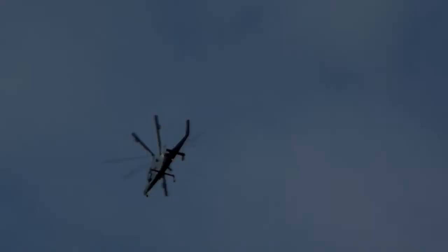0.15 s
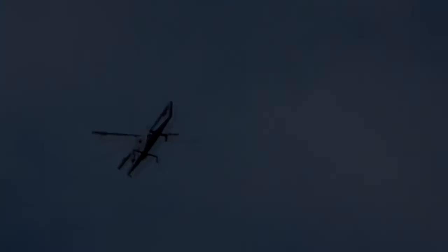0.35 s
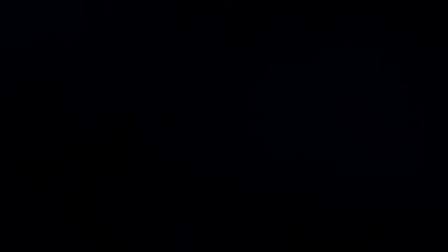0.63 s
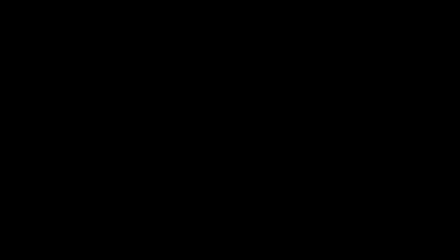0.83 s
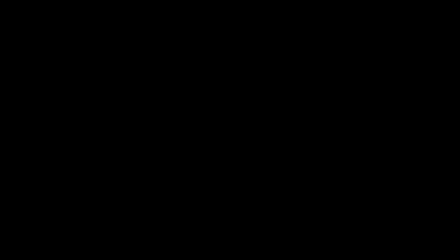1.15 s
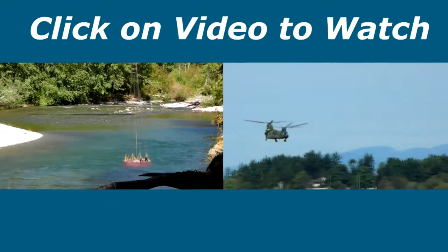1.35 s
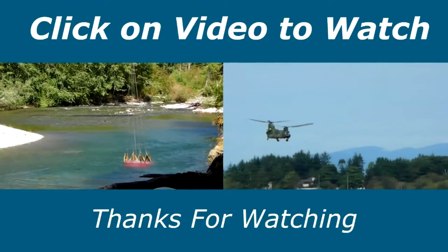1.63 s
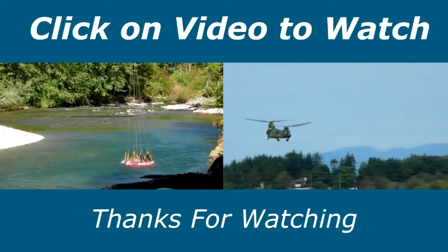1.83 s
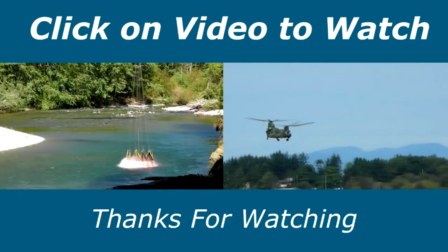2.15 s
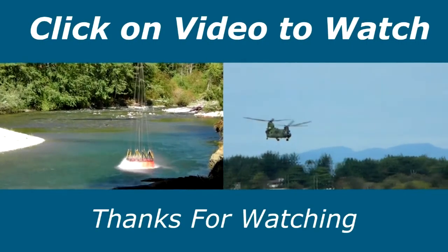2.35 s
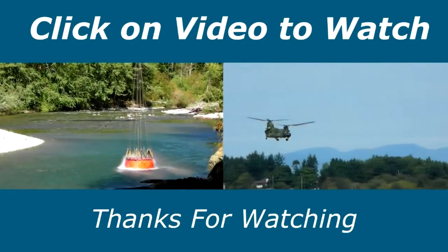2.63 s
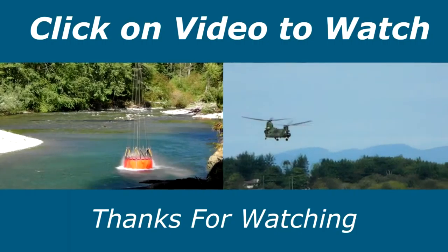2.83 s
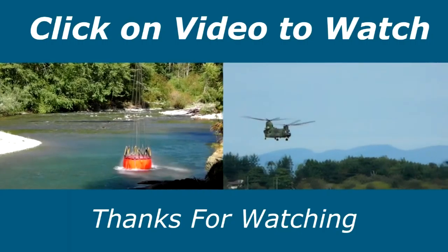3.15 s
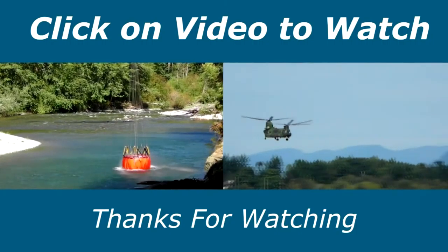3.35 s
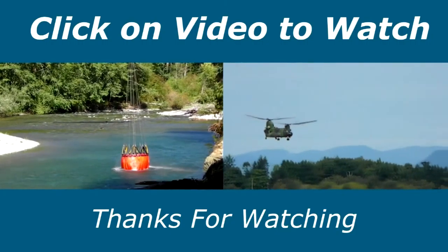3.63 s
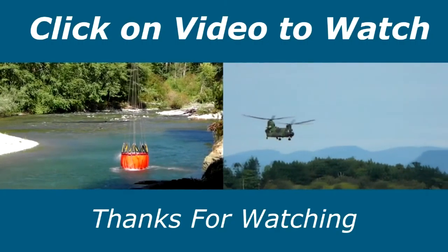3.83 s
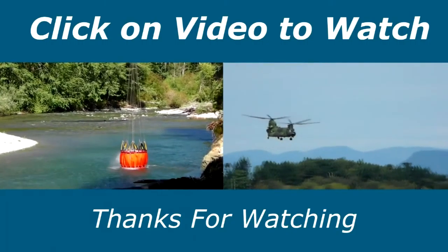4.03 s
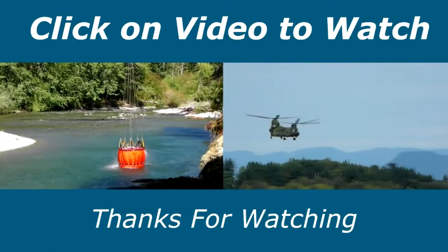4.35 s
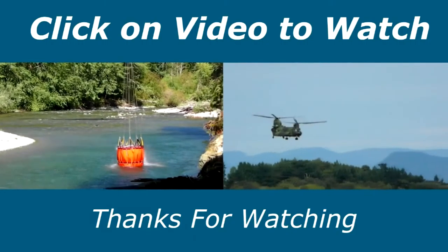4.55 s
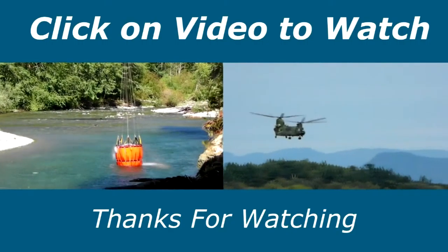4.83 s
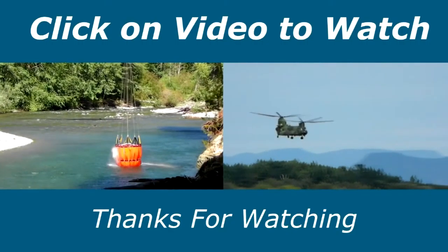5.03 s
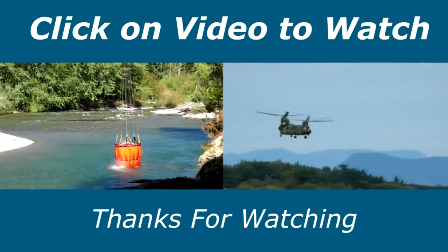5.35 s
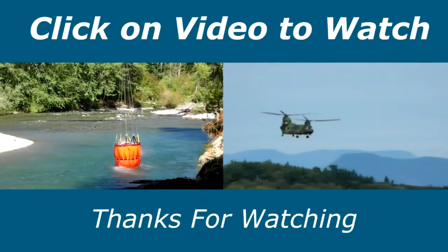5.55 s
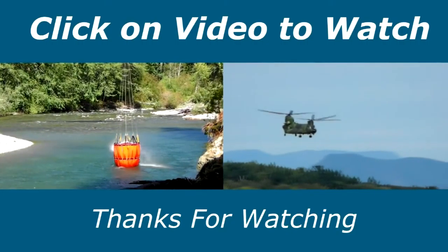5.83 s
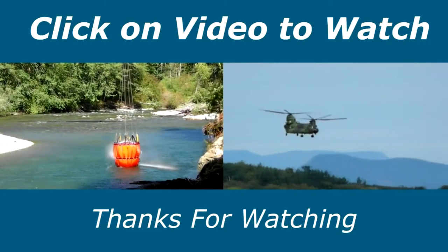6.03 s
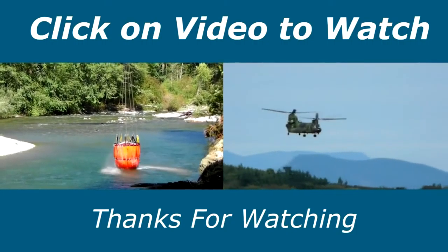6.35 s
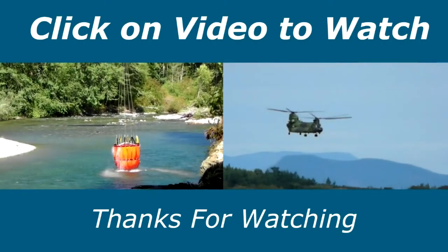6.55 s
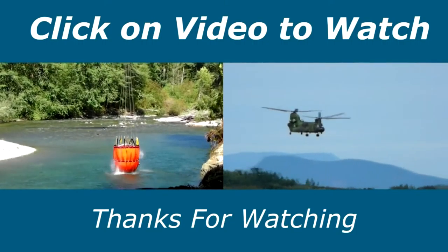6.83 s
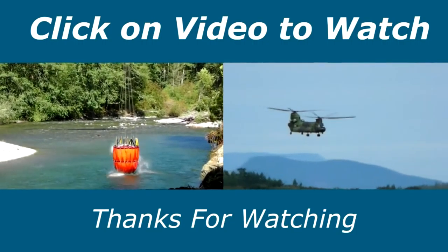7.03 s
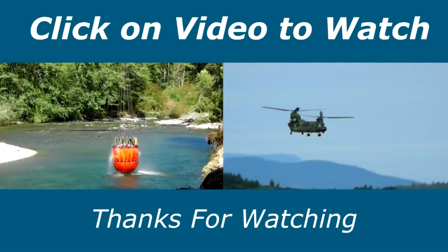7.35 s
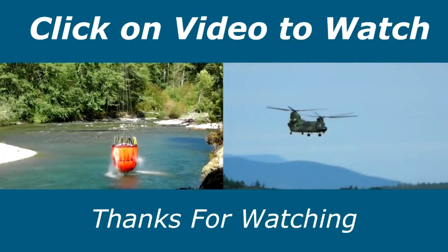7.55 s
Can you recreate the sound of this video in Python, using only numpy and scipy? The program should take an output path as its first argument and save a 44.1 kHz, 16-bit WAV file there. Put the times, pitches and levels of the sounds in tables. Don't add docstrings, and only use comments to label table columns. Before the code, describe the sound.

Outdoors on open ground, a far helicopter howls with a breathy turbine whine and soft quick blade flaps, fading within about a second. After a short dead silence, a twin-rotor helicopter fades in, its sharp front slaps about fourteen a second, with softer rear answers between them over turbine roar. It swells and eases as it turns, then jumps back abruptly and repeats. A faint bird whistles once; small dry ticks sit near the microphone.

```python
import sys
import numpy as np
from scipy import signal
from scipy.io import wavfile
from scipy.ndimage import uniform_filter1d

SR = 44100
rng = np.random.default_rng(int(sys.argv[2]) if len(sys.argv) > 2 else 0)


def volts_from_db(level):
    exponent = np.asarray(level, float) / 20
    return 10 ** exponent


def file_out(sig):
    cols = np.atleast_2d(sig).T
    lim = np.clip(cols, -1, 1)
    pcm = np.round(lim * 32767).astype(np.int16)
    wavfile.write(sys.argv[1], SR, pcm)


N = 339129

# f/Hz, level/dB per Hz
FAR_COLOUR = [(30, -59.5), (100, -21), (197, -28), (300, -16), (460, -11.5), (510, -10.5), (860, -9),
              (1100, -13.5), (1500, -11.5), (2150, -4.5), (3500, -30), (4700, -39), (5300, -54.5),
              (15500, -53.5)]
# from f/Hz, to f/Hz
FAR_BANDS = [(450, 1300), (8500, 15000)]
# f/Hz, width/Hz, level/dB
FAR_HOWL = [(1963, 160, 1), (2130, 110, 0), (2544, 240, -7.5), (1808, 70, -4.5), (2380, 440, -5.5),
            (890, 120, -10.5)]
# t/s, level/dB
FAR_WHINE = [(0, -58), (.16, -50.5), (.33, -57.5), (.4, -75), (.62, -76), (.72, -61), (.91, -69),
             (.95, -77), (1.14, -89.5)]
# t/s, level/dB
FAR_FADE = [
    (0, 0),
    (.45, -2),
    (.65, -7),
    (.9, -15),
    (1.07, -19),
    (1.14, -42),
]
# t/s, f/Hz, level/dB
BIRD = [
    (3.5, 3830, -75),
    (3.53, 3810, -49),
    (3.6, 3700, -46),
    (3.63, 3710, -70),
]
# t/s, level/dB, f/Hz, length/s
RUSTLES = [
    (.332, -42.5, 10160, 0.0019),
    (0.316, -56.5, 5550, .05),
    (0.33, -60.5, 12300, .05),
    (0.392, -67, 12600, .07),
    (6.1156, -39, 5670, 0.01),
    (6.169, -41, 6130, 0.0058),
    (6.193, -36.5, 8070, 0.0079),
]
# f/Hz, level/dB per Hz
TWIN_COLOUR = [(26, -42), (112, -15), (232, -2), (382, -3), (522, -0.5), (722, 0), (1010, -7), (1620, -13),
               (2650, -16), (4250, -24), (6250, -32.5), (8050, -34.5), (10500, -43), (15400, -65)]
# from f/Hz, to f/Hz
TWIN_BANDS = [(300, 1000), (1500, 4000), (4500, 7300), (8500, 13000)]
# t/s, turbine roar level/dB, rush of air level/dB
ENGINE = [(1.24, -42, -59.5), (1.68, -38, -56.5), (1.93, -33.5, -57.5), (2.11, -34, -59.5),
          (2.37, -35.5, -61), (2.6, -36, -58.5), (2.9, -36, -65), (3.26, -37.5, -57), (3.54, -39.5, -62),
          (3.74, -33, -58), (4.05, -28.5, -60), (4.28, -37.5, -61.5), (4.45, -36, -70), (4.63, -29.5, -67),
          (4.84, -30, -68), (5.1, -34, -73), (5.32, -34, -70), (5.52, -33.5, -61.5)]
HUM_ORDERS = [4, 6, 8, 11]
# level before the turn/dB, level after/dB, share of the rear loading
HUM = [(-38.5, -37.5, 0.39), (-49.5, -34, 0.43), (-45, -64, 0.012), (-58.5, -43.5, 0.032)]
# count of passes, spacing/ms
PERIODS = [
    (8, 71.49),
    (16, 71.21),
    (11, 71.67),
    (6, 71.83),
    (18, 72.245),
]
# t/s, front slap level/dB, thump level/dB, rear answer level/dB, tip crack level/dB
LOADING = [(1.26, -9, -21, -39.5, -49), (1.66, -12, -32, -31.5, -50), (1.8, -8, -18, -39, -36),
           (2.0, -6, -18, -27, -38), (2.3, -6.5, -29, -22.5, -37.5), (2.55, -6, -34, -23.5, -34.5),
           (2.68, -6.5, -40, -27, -36.5), (2.88, -8.5, -40, -32, -48), (3.0, -12.5, -30, -29.5, -45.5),
           (3.26, -16, -22, -28.5, -47.5), (3.55, -9.5, -14, -24, -43.5), (3.8, -6.5, -20, -21.5, -41.5),
           (4.12, -12, -14, -25, -45), (4.3, -4.5, -16, -25.5, -37), (4.68, -8.5, -11.5, -21.5, -33.5),
           (4.8, -6, -7, -23.5, -39), (5.13, -5.5, -19, -21, -34.5), (5.5, -7.5, -9, -25.5, -47.5)]
# slap/dB, thump/dB, rear/dB, crack/dB, flutter/dB
SCATTER_DB = (.6, 2.5, 1.2, 2, 2.5)
# t/s, level/dB, width/s
VORTEX_HITS = [
    (1.91, -9, .05),
    (2.08, -9, .2),
    (3.33, -11.5, .05),
    (2.54, -15, 0.12),
    (4.67, -5, .11),
    (5.35, -7.5, 0.18),
]
# f/Hz, width/Hz, depth 0-1
NOTCHES = [(191.8, 31, 1), (7930, 1100, 0.96)]

FAR_END_S, TWIN_START_S = 1.14, 1.368
ROUND_FROM_S, ROUND = 1.23, 189452
TURN_START_S, TURN_END_S = 2.94, 3.6
PASS_MS = np.arange(-25, 25, 1000 / SR)


def evened(x):
    return x / np.sqrt(np.mean(x ** 2) + 1e-20)


def read(points, hz):
    f, value = np.transpose(points)
    return np.interp(np.log(hz + 1), np.log(f + 1), value)


def curves(rows, t):
    s, *columns = np.transpose(rows)
    return [np.interp(t, s, c) for c in columns]


def add(mix, s, sound):
    part = mix[round(s * SR):][:len(sound)]
    part += sound[:len(part)]


def band(x, hz, width):
    b, a = signal.iirpeak(hz, hz / width, SR)
    once = signal.lfilter(b, a, x)
    return evened(signal.lfilter(b, a, once))


def bump(x, centre, width):
    return np.exp(-((x - centre) / width) ** 2)


def air_noise(count, colour, bands, levels_db, patchy_db):
    hz = np.fft.rfftfreq(1024, 1 / SR)
    a, b, patches = rng.standard_normal((count // 256 + 5, 513, 3)).T
    patches = evened(uniform_filter1d(uniform_filter1d(patches, 10, 0), 10, 1))
    shape_db = read(colour, hz)
    own_db = [10 * np.log10(np.sum(volts_from_db(2 * shape_db)[(hz > lo) & (hz < hi)])) for lo, hi in bands]
    frames = np.minimum(np.arange(a.shape[1]) * 256, count - 1)
    lift_db = np.array([level[frames] - own for level, own in zip(levels_db, own_db)])
    centres = np.mean(bands, 1)
    share = np.array([read(list(zip(centres, row)), hz) for row in np.eye(len(bands))])
    z = (a + 1j * b) * volts_from_db(shape_db[:, None] + share.T @ lift_db + patchy_db * patches)
    return np.sqrt(1.5) * signal.istft(z, nperseg=1024, noverlap=768)[1][:count]


def far_howl(t, fade_db):
    throb_db = 7.5 * bump(t, .4, 0.17) * np.cos(2 * np.pi * (t - 0.2826) / .1)
    dulls_db = -43.5
    howl = np.zeros(len(t))
    for hz, width, db in FAR_HOWL:
        tilt_db = dulls_db * (hz / 1000 - 2) * np.minimum(t - .25, 0)
        howl += volts_from_db(db + tilt_db) * band(rng.standard_normal(len(t)), hz, width)
    gusts = uniform_filter1d(uniform_filter1d(rng.standard_normal(len(t)), size=200), size=200)
    return volts_from_db(-25 + fade_db + throb_db + 1.3 * evened(gusts)) * evened(howl)


def far_beats(count):
    first_s, period_s, passes_heard = .087, .1125, 10
    out = np.zeros(count)
    u = np.arange(2000) / SR
    rise = 1 - np.exp(-u / 0.00092)
    thud = np.sin(2 * np.pi * 105 * u) + 0.67 * np.sin(2 * np.pi * 160 * u)
    thud *= bump(u, 0.014, .012)
    for k, (p, q) in enumerate(rng.random((passes_heard, 2))):
        s = first_s + k * period_s
        faded_db = 0.84 * curves(FAR_FADE, s)[0]
        flap = np.sin(2 * np.pi * (295 * u + p)) + 0.95 * np.sin(2 * np.pi * (440 * u + q))
        add(out, s, volts_from_db(-24 + faded_db - 4 * (k % 2)) * rise * np.exp(-u / 0.0099) * flap)
        add(out, s + .004, volts_from_db(-41.5 + faded_db) * thud)
    return out


def far_machine():
    t = np.arange(round(FAR_END_S * SR)) / SR
    fade_db, = curves(FAR_FADE, t)
    wash_db, hiss_db = -32 + fade_db, -65 + 0.79 * fade_db
    air = volts_from_db(-2.0) * air_noise(len(t), FAR_COLOUR, FAR_BANDS, (wash_db, hiss_db), patchy_db=1.5)
    whine = np.sqrt(2) * volts_from_db(curves(FAR_WHINE, t)[0]) * np.sin(2 * np.pi * 4572 * t)
    out = far_howl(t, fade_db) + air + whine + far_beats(len(t))
    return np.pad(out, (0, N - len(t)))


def bird(t):
    hz, level_db = curves(BIRD, t)
    singing = (t > BIRD[0][0]) * (t < BIRD[-1][0])
    return volts_from_db(level_db) * np.sin(2 * np.pi * np.cumsum(hz) / SR) * singing


def rustles():
    for s, db, hz, length in RUSTLES:
        raw = rng.standard_normal(4000)
        scrape = band(raw, hz, 2500) + .5 * np.diff(raw, prepend=0)
        scrape = scrape[1000:1000 + round(length * SR)]
        yield s, volts_from_db(db) * scrape * signal.windows.tukey(len(scrape), .5)


def turned(t):
    return np.clip((t - TURN_START_S) / (TURN_END_S - TURN_START_S), 0, 1)


def passes():
    counts, ms = np.transpose(PERIODS)
    gaps_ms = np.repeat(ms, counts.astype(int))
    return 1.2629 + np.r_[0, np.cumsum(gaps_ms)] / 1000


def blade_turns(t):
    at = passes()
    at = np.r_[2 * at[0] - at[1], at, 2 * at[-1] - at[-2]]
    return np.interp(t, at, np.arange(len(at)))


def engine_and_air(t):
    roar_db, rush_db = curves(ENGINE, t)
    slap_db, _, rear_db, _ = curves(LOADING, t)
    wash_db = -20.5 + 0.38 * slap_db + 0.31 * rear_db
    fizz_db = -45.5 + 0.28 * roar_db + 3 * np.maximum(t - TURN_END_S, 0)
    levels_db = wash_db, roar_db, fizz_db, rush_db
    return volts_from_db(-0.5) * air_noise(ROUND, TWIN_COLOUR, TWIN_BANDS, levels_db, patchy_db=1.5)


def repeating_wake():
    swirls = [band(rng.standard_normal(9000), 365, 206)[-6400:] * np.hanning(6400) for _ in range(2)]
    out = np.zeros(ROUND)
    for k, s in enumerate(passes()):
        blend = np.pi * k / 45
        churn = np.cos(blend) * swirls[0] + np.sin(blend) * swirls[1]
        add(out, s - ROUND_FROM_S, volts_from_db(0.53 * curves(LOADING, s)[2] - 21.5) * churn)
    return out


def tip_puffs(t):
    rush_db = curves(ENGINE, t)[1]
    halves = 2 * blade_turns(t) - .8 + 1
    uneven_db = 4 * rng.standard_normal(200)[halves.astype(int)]
    hiss = band(rng.standard_normal(len(t)), 9130, 4200)
    return volts_from_db(rush_db + 3.5 + uneven_db) * np.sin(np.pi * halves) ** 6 * hiss


def hum(t):
    turns = blade_turns(t - .0037)
    rear_db = curves(LOADING, t)[2]
    out = np.zeros(len(t))
    for k, (before_db, after_db, share) in zip(HUM_ORDERS, HUM):
        level_db = before_db + (after_db - before_db) * turned(t) + share * rear_db
        out += np.sqrt(2) * volts_from_db(level_db) * np.cos(2 * np.pi * k * turns)
    return out


def rear_pass(level_db, thump_db):
    ms = PASS_MS
    wave = bump(ms, -2.29, 0.47) - bump(ms, -3.5, 0.47) - 0.43 * bump(ms, -0.59, 0.41)
    wave += 0.086 * band(rng.standard_normal(len(ms)), 385, 640) * bump(ms, -2.3, 4.5)
    wave += 0.29 * np.cos(2 * np.pi * 390 * (ms + 2.23) / 1000) * bump(ms, -1.5, 4.6)
    thump = bump(ms, 0.27, 4.1) - bump(ms, -2.7, 1.6)
    return volts_from_db(level_db + 4.0) * wave + volts_from_db(thump_db - 14) * thump


def front_pass(slap_db, rise, crack_db, thump_db, after_db, before_db, lead):
    ms = PASS_MS
    dip = np.exp(-abs(ms / 0.45) ** 0.82)
    rise = np.clip(rise, .6, 2.1)
    crest = 0.76 / rise * bump(ms, rise, 0.43 * rise) + 0.22 * bump(ms, -2.155, 0.67)
    crack = np.diff(bump(ms, .45, 0.027), prepend=0)
    thump = bump(ms, 3.2, 2.0) - .5 * bump(ms, -.8, 1.6) - .6 * bump(ms, 6.6, 1.6)
    flutter = band(rng.standard_normal(len(ms)), 684, 590)
    flutter *= volts_from_db(before_db) * bump(ms, -lead, 2.6) + volts_from_db(after_db - 13.5) * bump(ms, 4.8, 3.2)
    wake_hz = 735 * rng.uniform(1.0, 1.05)
    flutter -= volts_from_db(after_db - 4.5) * np.cos(2 * np.pi * wake_hz * ms / 1000) * bump(ms, 2.0, 1.8)
    slap = volts_from_db(slap_db) * (crest - dip)
    return slap + volts_from_db(crack_db + 8.5) * crack + volts_from_db(thump_db - 10.5) * thump + flutter


def rotor_blades():
    blades, moments = np.zeros(ROUND), passes()
    boom = np.cos(2 * np.pi * 242 * (PASS_MS - 5.5) / 1000) * bump(PASS_MS, 6.7, 6.7)
    for s, chance in zip(moments, rng.standard_normal((len(moments), 5)) * SCATTER_DB):
        slap_db, thump_db, rear_db, crack_db = curves(LOADING, s) + chance[:4]
        rise_ms = 0.87 + 0.3 * max(-7 - slap_db, 0) * (1 - turned(s))
        hits_db = [db - 20 * ((s - hit_s) / width) ** 2 for hit_s, db, width in VORTEX_HITS]
        after_db = max(-35 + chance[4], *hits_db)
        lead_ms = 10.5 + (3.1 - 10.5) * turned(s)
        before_db = -27.5 + (-33.5 + 27.5) * turned(s) + chance[4]
        rear_lag_ms = 38.8 - 2.4 * max(s - 2.75, 0)
        at = s - ROUND_FROM_S - .025
        add(blades, at, front_pass(slap_db, rise_ms, crack_db, thump_db, after_db, before_db, lead_ms))
        add(blades, at, volts_from_db(-25.5) * bump(s, 3.1, 0.58) * boom)
        add(blades, at + rear_lag_ms / 1000, rear_pass(rear_db, thump_db))
    return blades


def ground_echo(blades, noise):
    low_roar = signal.lfilter(*signal.butter(2, 650, fs=SR), noise)
    return np.roll(signal.lfilter([.3], [1, -.7], .5 * blades + 0.19 * low_roar), 116)


def limiter(x, knee_db, share, recovery_db):
    fall = np.arange(len(x)) * recovery_db / SR
    peak_db = np.maximum.accumulate(20 * np.log10(abs(x) + 1e-9) + fall) - fall
    over_db = uniform_filter1d(np.maximum(peak_db - knee_db, 0), size=41)
    return x / volts_from_db(share * np.roll(over_db, 50))


def twin_rotor():
    t = ROUND_FROM_S + np.arange(ROUND) / SR
    blades = rotor_blades()
    microphone_hiss = volts_from_db(-70) * band(rng.standard_normal(ROUND), 12500, 5000)
    noise = engine_and_air(t) + repeating_wake() + microphone_hiss + tip_puffs(t)
    outdoors = blades + noise + ground_echo(blades, noise)
    heard = signal.lfilter(*signal.butter(2, 72, "high", fs=SR), outdoors)
    heard += hum(t) + bird(t)
    return limiter(heard, knee_db=-14.5, share=0.7, recovery_db=177)


def scene():
    far, twin = far_machine(), twin_rotor()
    for s, sound in rustles():
        if s < ROUND_FROM_S:
            add(far, s, sound)
        else:
            add(twin, s - ROUND_FROM_S - ROUND / SR, sound)
    t = np.arange(N) / SR
    played = twin[(np.arange(N) - round(ROUND_FROM_S * SR)) % ROUND]
    fade_from_s, fade_to_s = 1.088, 3.166
    fade = .5 - .5 * np.cos(np.pi * np.clip((t - fade_from_s) / (fade_to_s - fade_from_s), 0, 1))
    return (far * (t < FAR_END_S) + played * fade * (t > TWIN_START_S))[None]


def roll_off(x):
    return signal.sosfilt(signal.butter(12, 15780, fs=SR, output="sos"), x)


def record(dry):
    t = np.arange(N) / SR
    for hz, width, depth in NOTCHES:
        dry = dry - np.clip(depth, 0, 1) * signal.lfilter(*signal.iirpeak(hz, hz / width, SR), dry)
    return roll_off(dry * ((t < FAR_END_S) | (t > TWIN_START_S)))


dry = scene()
out = record(dry)
file_out(out)
```